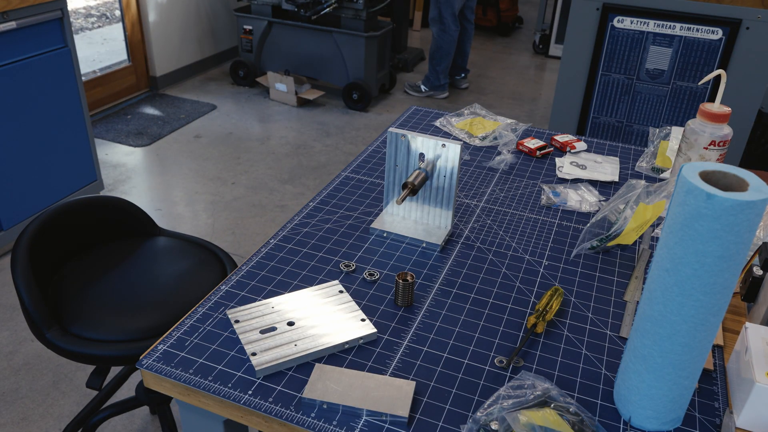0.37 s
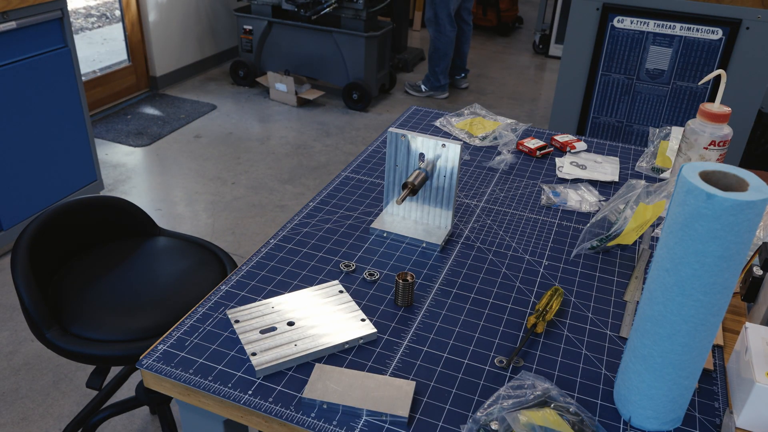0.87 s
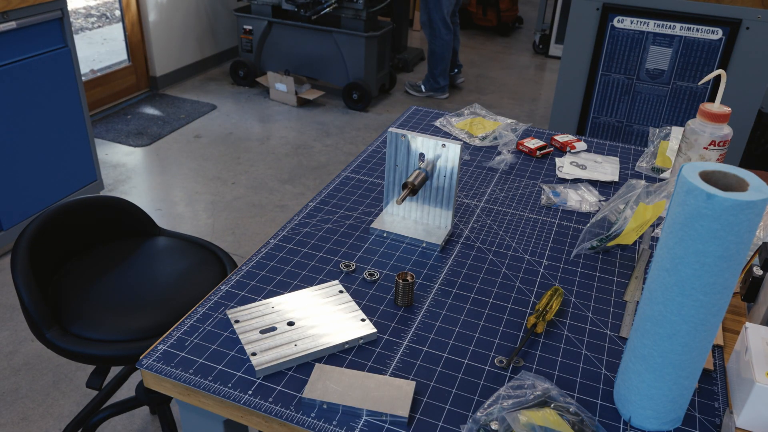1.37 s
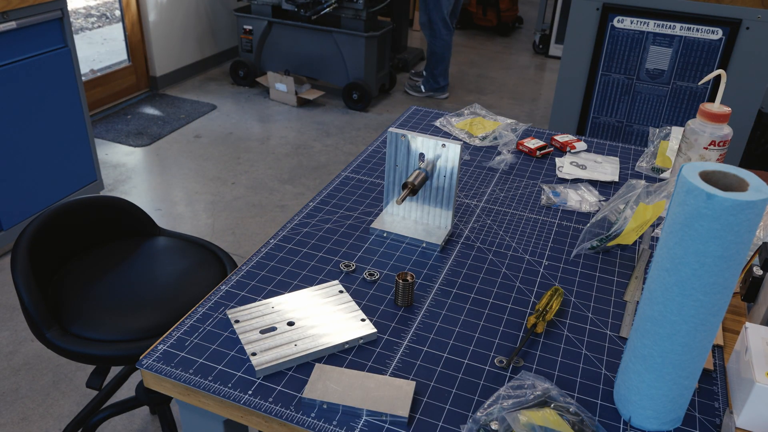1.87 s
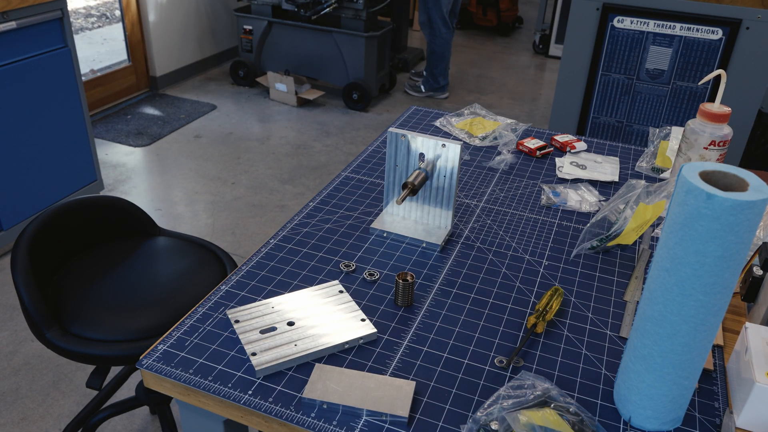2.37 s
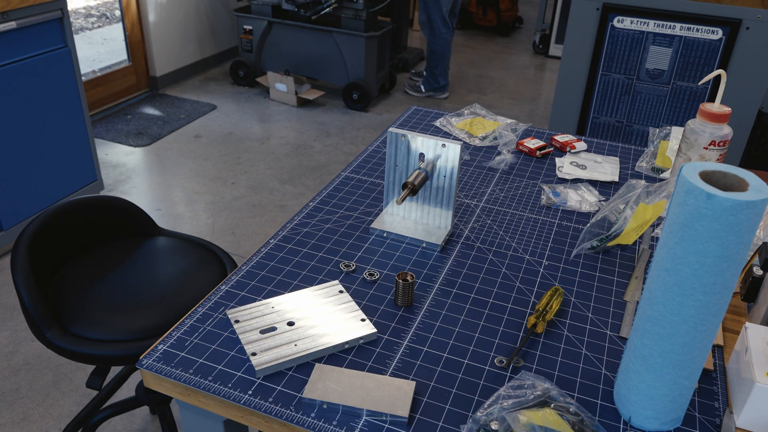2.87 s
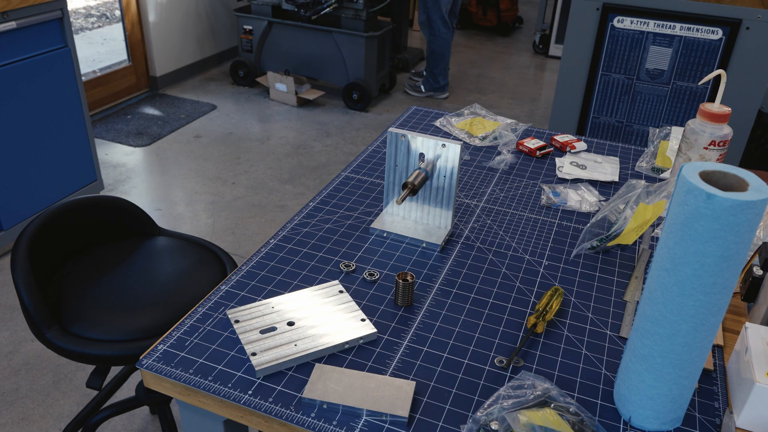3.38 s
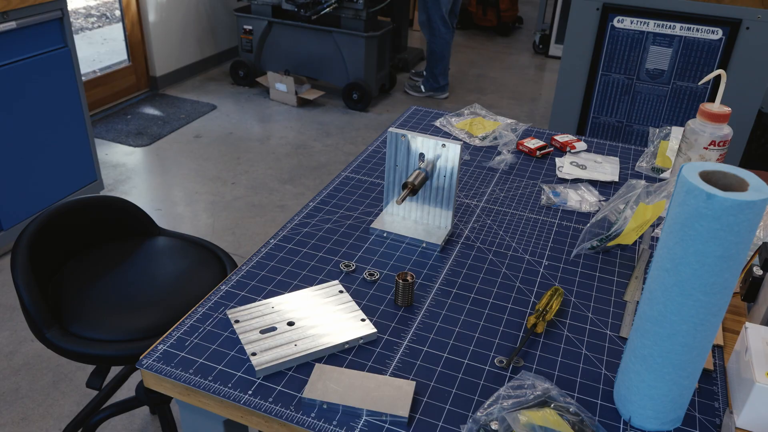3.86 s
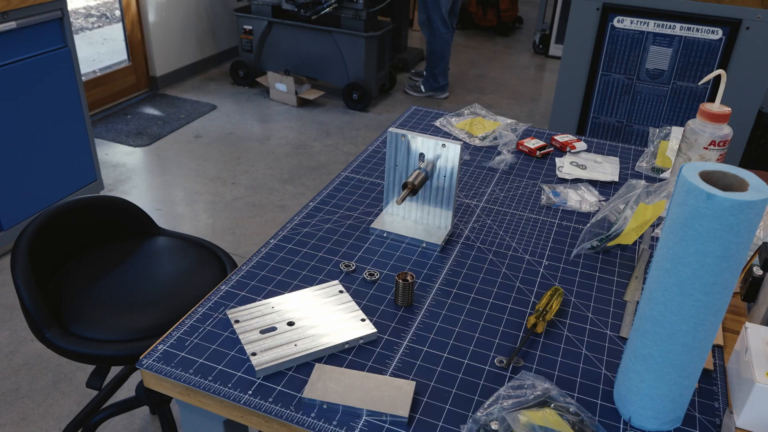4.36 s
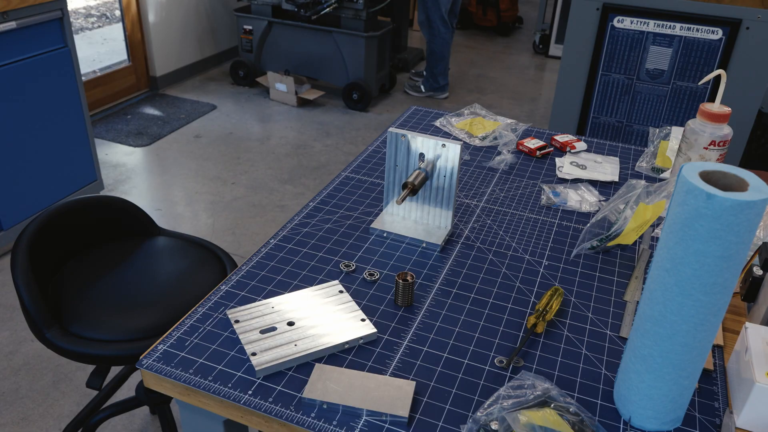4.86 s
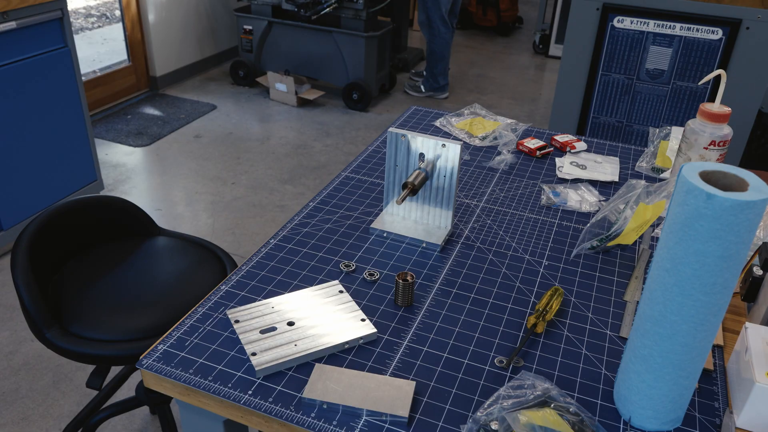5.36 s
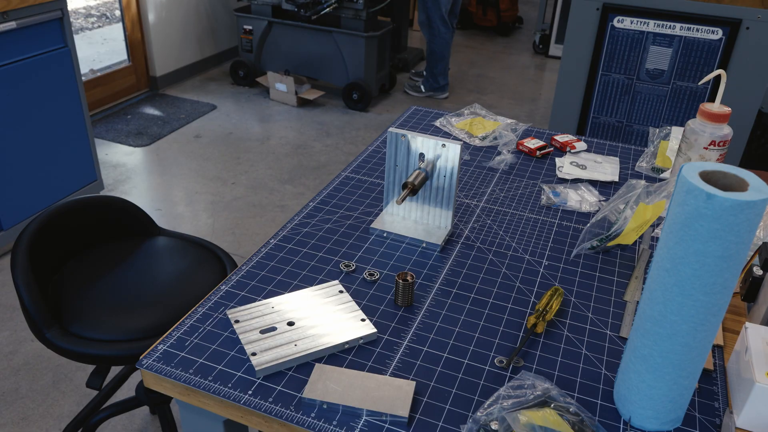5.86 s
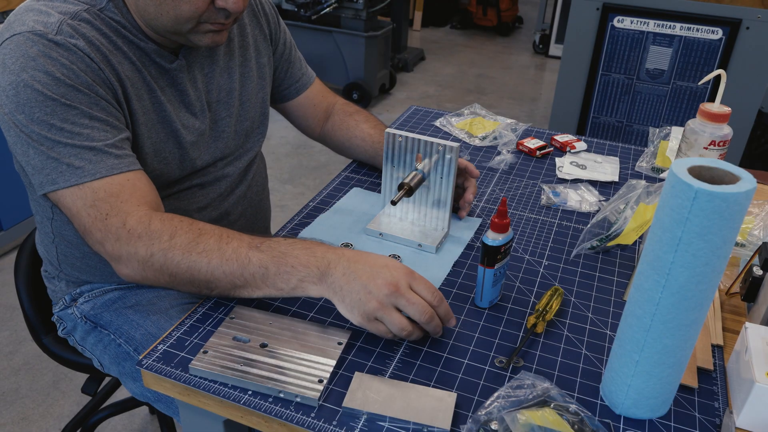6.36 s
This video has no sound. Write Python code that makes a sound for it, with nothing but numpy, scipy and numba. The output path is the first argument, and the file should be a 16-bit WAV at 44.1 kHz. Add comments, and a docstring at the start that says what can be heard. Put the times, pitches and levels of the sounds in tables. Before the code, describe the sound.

From 0 s a bench motor across a workshop runs up: mains buzz and rising slot tones growl through a resonant stand, with short singing notes and rapid rattling of loose metal. A dry switch drag enters near 0.5 s, with snaps at about 0.6 and 0.8 s and a thin squeak. By 1.05 s it reaches full speed and settles into a hum and throbbing airy rush. At 2.15 s a steel shaft presses on the abrasive wheel: a harsh, hissing scrub with high ringing, fluttering every turn, thinner and bouncier after 3.5 s, fading by 4.45 s. The rush continues through tiny scratches and pings at 4.5-4.8 s. A second press from about 4.85 s is brighter, steadier and more repetitive, with a faint singing underneath. At 6.05 s it cuts abruptly to very quiet room noise, faint rustles and soft bench bumps until 6.5 s.

```python
"""In a workshop, a bench motor across the room runs up to speed, then settles to a hum and a rush of noise.
Its slot tones climb through a ringing stand, while loose parts rattle and the starting switch drags and snaps.
A steel shaft is pressed twice on the abrasive wheel: noise that partly repeats each turn is its scrub and ring.
Then the sound cuts to the quiet shop: soft room noise with faint rustles and bumps."""
import sys
import numpy as np
from scipy import signal
from scipy.fft import rfft, irfft, next_fast_len
from scipy.io import wavfile
from scipy.ndimage import uniform_filter1d, map_coordinates
from numba import njit

SR = 44100
rng = np.random.default_rng(int(sys.argv[2]) if len(sys.argv) > 2 else 0)


def transcribe(signal):
    """Save signal, clipped to [-1, 1], as a 16-bit WAV file at the path in sys.argv[1]."""
    frames = np.atleast_2d(signal).T
    limited = np.clip(frames, -1, 1)
    pcm = np.round(limited * 32767).astype(np.int16)
    wavfile.write(sys.argv[1], SR, pcm)


def undo_db(level):
    """Turn decibels back into plain size, where 20 dB means ten times bigger."""
    steps = np.asarray(level, float) / 20
    return 10 ** steps


N = 286032
T = np.arange(N) / SR  # time in s
CUT_S = 6.047  # the grinder gives way to the quiet shop
PULL_HZ, SLOTS = 120, 24  # magnetic pulls per second; rotor slots per turn
TURN = 1475  # samples a turn at full speed

# Run-up: time between rotor slots [t/s, period/ms]
SLOT_PERIOD = [(0, 7.69), (.135, 6.45), (.355, 5.15), (.595, 3.87), (.8, 2.77), (.9, 2.19), (1.015, 1.45),
               (1.05, 1.394)]
# Slot tones split by the mains pull [multiple of slot rate, steps of pull rate, relative level/dB]
SLOT_TONES = [(1, 0, 2), (1, -1, 0), (1, -2, -6), (1, 1, -7), (1, 2, -8), (2, 0, -8), (2, -1, -7),
              (2, -2, -14), (3, -1, -9), (3, -2, -7), (3, -3, -9), (4, -2, -11), (4, -3, -9), (4, -4, -10)]
# Mains buzz in the stand, fading as the motor speeds up
# [multiple of pull rate, relative level/dB before the fade]
BUZZ = [(2, -5), (3, -3), (4, -8), (5, -6), (6, -9), (8, -25), (10, -8)]
# Resonances of the stand, and of its guard [f/Hz, width of one filter/Hz, relative level/dB]
STAND_MODES = [(182, 76, -12.5), (240, 36, -5.5), (286, 58, -11), (339, 54, -3.5), (428, 70, 2.5),
               (504, 110, -6), (636, 200, -12.5), (910, 570, -15.5), (1720, 1600, -54)]
GUARD_MODES = [(778, 30, 0)]
# Slot tones that drive the guard [multiple of slot rate, peak level/dB before the guard]
GUARD_ORDERS = [(2, -31), (3, -22), (4, -27), (5, -36)]
# Strain of the run-up, heard as the growl of the stand [t/s, level/dB]
GROWL = [(0, -32.5), (.2, -24.5), (.5, -24.5), (.8, -18), (.92, -20), (1.09, -27.5), (1.2, -20)]
# Short tones singing near 430 Hz during the run-up [start t/s, length/s, peak level/dB]
SINGING_TONES = [(.495, 0.042, -17), (.58, 0.036, -19), (.635, 0.045, -15.5), (.825, 0.044, -12),
                 (.885, 0.054, -17), (.922, 0.095, -17.5)]
# Pitch of that singing; the last tone glides upward [t/s, f/Hz]
SINGING_PITCH = [(.5, 425), (.66, 432), (.83, 430), (.86, 443), (.918, 450), (.922, 385), (.975, 440),
                 (1.01, 505)]
# Resonances of the loose parts, and of a plate [f/Hz, width/Hz, relative level/dB]
RATTLE_MODES = [(2450, 215, 12), (2750, 130, 16), (2970, 180, 10.5), (3400, 2000, -6), (5500, 840, -42)]
PLATE_MODES = [(1298, 43, 0)]
# Loudness of the plate [t/s, level/dB]
PLATE_LEVEL = [(0.0, -43.5), (0.128, -40.5), (0.232, -41), (0.272, -50), (0.302, -39), (0.386, -46),
               (0.516, -36.5), (0.652, -44), (0.79, -34.5), (0.832, -44), (0.878, -34), (0.982, -35),
               (1.05, -27.5), (1.1, -36)]
# Surges of the mains hum [start t/s, length/s, peak level/dB]
SURGES = [(-.1, 0.3, -33.5), (.34, 0.18, -37.5), (.69, 0.054, -35.5), (.8, .05, -52), (1.05, 0.25, -42)]

# Rush at speed; its level dips during the grinding [t/s, level/dB, treble gain/dB]
RUN = [(1.04, -25, 0.5), (1.35, -27, 3), (1.6, -27, 2), (2.15, -27.5, 0), (2.21, -28, -2),
       (2.4, -30.5, -13), (2.75, -35, -5.5), (3.2, -37.5, -4.5), (4.25, -36.5, 0.5), (4.35, -34, -0.5),
       (4.55, -34, 3.5), (4.62, -32.5, 1.5), (4.73, -34, 4), (4.88, -34, -15), (5.05, -38.5, -10),
       (6.04, -38, -30)]
# Colour of the rush [f/Hz, relative level/dB per Hz]
RUSH_COLOUR = [(18, -73), (30, -40), (179, -17), (233, -7.5), (295, -13.5), (384, 0), (649, 0), (721, 1),
               (1040, -2.5), (1250, -1.5), (2170, -21.5), (2540, -20.5), (5500, -23.5), (7800, -24.5),
               (9800, -26.5), (11700, -26), (12700, -30.5), (16000, -36.5)]
# Steady tones on multiples of a turn [f/Hz, peak level/dB re the rush]
HUM = [(120, -35), (240, -5.5), (269, -20), (389, -9), (479, -9.5), (599, -9.5), (719, -5), (748, -8.5),
       (1197, -26)]

# The two presses on the wheel [t/s, scrub level/dB, treble level/dB re scrub, ring level/dB]
GRIND = [
    [(2.149, -37, -5, -33), (2.17, -32.5, -10, -33), (2.35, -30, -7, -27), (2.55, -30.5, -5.5, -28),
     (2.85, -31, -7.5, -25), (2.96, -28, -11, -33), (3.05, -30.5, -10.5, -25.5), (3.19, -30, -10, -28.5),
     (3.27, -31.5, -5.5, -26), (3.45, -30.5, -6.5, -31), (3.8, -36, -1, -28.5), (4.08, -36.5, -0.5, -31.5),
     (4.24, -35.5, 1.5, -31), (4.29, -38, -3.5, -23.5), (4.34, -39.5, 2, -48), (4.38, -46, -2, -43),
     (4.42, -49, 0, -53), (4.47, -53, -6, -68)],
    [(4.732, -58, 2, -27), (4.74, -47, 2, -29), (4.755, -45, 5, -33), (4.78, -46, 3, -30),
     (4.81, -43, 4, -26), (4.84, -44.5, -1.5, -23), (4.856, -34.5, -5, -26), (4.88, -33.5, -2, -27.5),
     (5.05, -35.5, -4.5, -24), (5.3, -38, 2, -29.5), (5.42, -36.5, -1, -30.5), (5.6, -39.5, 4.5, -32),
     (5.92, -38.5, 4.5, -33.5), (6.0, -40, 4.5, -25), (6.04, -43.5, 3, -26)],
]
# How still the shaft is held, so that the same grit meets it each turn [t/s, share 0-1]
STILL = [(2.5, .15), (2.9, .1), (3.5, .2), (4.0, .4), (5.0, .3), (5.35, .55), (5.7, .65)]
# The wheel runs out of true [share of a turn, height as level/dB, scaled in each use]
RUNOUT = [(.04, -2), (.12, -.5), (.21, 0), (.29, 2.5), (.37, 1.5), (.46, -1), (.56, -2.5), (.68, -3),
          (.79, 0), (.87, 2), (.96, 0)]
# Pitch of the ring, shifting a little with the grip [t/s, f/Hz]
RING_PITCH = [(2.15, 7630), (2.37, 7690), (2.83, 7620), (2.97, 7520), (3.42, 7640), (3.75, 7550),
              (4.3, 7660), (4.85, 7715), (5.05, 7710), (5.43, 7590), (5.7, 7680), (5.95, 7590)]
# High spots that set the ring going [share of a turn, level/dB before the bounce scales it]
RING_SPOTS = [(.04, -6), (.12, -2), (.22, 0), (.37, 2), (.46, 0), (.54, -6), (.62, 1), (.71, 1), (.79, -4),
              (.87, 4), (.96, 1)]
# A broad mode under the ring [t/s, level/dB re ring]
SHOULDER = [(2.15, -22), (2.8, -21), (2.92, -3.5), (3.1, -10), (3.3, -11), (3.45, -23), (6.04, -19)]
# Bounce on the high spots and the bending mode
# [t/s, bounce depth 0-1, mode level/dB before trim, centre f/Hz, throb as a factor on the runout]
BOUNCE = [(2.2, .1, 1, 4450, .2), (2.9, .15, 3, 4400, .4), (3.05, .15, 5, 4330, .4),
          (3.5, .3, 5, 4420, .45), (3.65, 1, 9, 4500, .35), (4.2, .8, 8, 4520, .3), (4.33, .2, 8, 4120, .3),
          (4.7, .2, 13, 4250, .3), (4.84, .2, 11, 4250, .3), (4.92, .2, 3, 4450, .4),
          (5.25, .15, 5, 4620, .6), (5.45, .15, 5, 4500, 1), (6.0, .15, 5, 4500, 1.2)]
# Low and middle shaft modes [f/Hz, width/Hz, relative level/dB]
SHAFT_LOW = [(1740, 31, -10), (3330, 90, -16), (3500, 150, -13), (3890, 130, -6), (4020, 70, -4),
             (4250, 140, -3), (4700, 120, -3), (4880, 220, -6), (5200, 140, -7)]
SHAFT_MID = [(5280, 1670, -0.5), (5960, 45, 4), (6010, 110, 2), (7070, 390, -1.5)]
# Thin modes heard once the shaft is held still [f/Hz, width/Hz, relative level/dB]
SHAFT_THIN = [(2720, 60, -8), (3150, 35, -2), (3360, 25, 0), (3980, 30, 0), (4250, 30, 1), (5800, 45, 4),
              (6150, 60, 4), (8150, 70, 5), (8520, 60, 3)]
# A mode that swells once a turn [t/s, level/dB re low modes, before the swing]
UPPER = [(2.2, -26), (3.3, -14), (3.7, -12), (4.25, -6), (4.4, -20), (4.9, -22), (5.3, -10), (5.55, -6),
         (5.9, -5), (6.04, -10)]
# The 5-7 kHz part of the treble [t/s, level/dB]
MIDDLE = [(2.15, 1.7), (4.25, 1.5), (4.74, 0), (4.84, -3), (4.9, 1.5), (6.04, 0.8)]
# Colour of the grit hiss [f/Hz, relative level/dB per Hz]
GRIT_COLOUR = [(5000, -25), (8500, 1), (9990, -0.5), (14400, -3), (15200, -4), (16000, -30)]
# A dull patch in the grit moves as the grip shifts [t/s, f/Hz]
DULL_PATCH = [(2.9, 12600), (3.25, 10000), (4.3, 10400), (4.9, 11000), (6.0, 11860)]
# Single catches of the shaft [t/s, start level/dB before shaping]
TOUCHES = [(2.1515, -27), (2.178, -20), (4.488, -29), (4.5096, -33), (4.6595, -33), (4.6875, -24),
           (4.7205, -16), (4.75, -20), (4.758, -18), (4.77, -20), (4.787, -19), (4.799, -17), (4.805, -16),
           (4.814, -21), (4.821, -22), (4.839, -14)]
# Grit scratches in passing [t/s, start level/dB before filtering]
SCRAPES = [(4.405, -31), (4.4875, -20), (4.51, -38), (4.687, -25), (4.72, -31)]
# Singing of the tool rest [t/s, level/dB]
REST_HUM = [(4.95, -56), (5.15, -45.5), (6.05, -50)]

# The starting switch drags and lets go [t/s, level/dB before the wobble]
SWITCH_DRAG = [(.456, -86), (.466, -54.5), (.57, -41.5), (.65, -41.5), (.67, -51.5), (.925, -42.5),
               (1.0, -51), (1.05, -69)]
# Colour of the drag [f/Hz, relative level/dB per Hz]
SWITCH_COLOUR = [(2940, -31), (5000, -15.5), (6830, -5.5), (7530, -6), (12800, -2.5), (14900, -12),
                 (16000, -0.5)]
# Snaps of the switch [t/s, start level/dB before filtering]
SNAPS = [(0.623, -21.5), (0.7915, -32)]
# Thin squeak of the switch [t/s, level/dB]
SQUEAK = [(.81, -70), (.83, -62), (.9, -55), (.97, -59), (1.0, -75)]

# Colour of the quiet shop [f/Hz, relative level/dB per Hz]
SHOP_COLOUR = [(25, 8), (60, 4), (110, 5), (190, 8), (300, 5), (520, 0), (640, -9), (1100, -13),
               (1700, -16), (2320, -12), (3300, -19), (5100, -24), (7000, -31), (16000, -35)]
# Rustles of handling [start t/s, length/s, peak level/dB before the wobble]
DULL_RUSTLES = [(6.2, 0.21, -74), (6.4, 0.089, -69)]
BRIGHT_RUSTLES = [(6.225, .05, -66), (6.25, .17, -74)]
# Soft bumps on the bench [t/s, start level/dB, f/Hz]
THUDS = [(6.105, -62, 1250), (6.136, -53, 100), (6.195, -57, 279), (6.38, -60, 230), (6.42, -63, 1200),
         (6.47, -65, 1100)]
# Deep rumble under everything [t/s, level/dB]
RUMBLE = [(0, -63), (.7, -70), (1.7, -67), (2.6, -81), (5.9, -74), (6.1, -72), (6.49, -67)]


def level(x, db):
    """Scale a sound to an rms level."""
    return x * undo_db(db) / np.sqrt(np.mean(x ** 2))


def curve(table, column=1, out=None):
    """Join one column by straight lines in time."""
    rows = np.array(table)
    return np.interp(T, rows[:, 0], rows[:, column], left=out, right=out)


def round_curve(table, turns):
    """Read a table by the position within a turn."""
    return np.interp(turns % 1, *np.transpose(table), period=1)


def white():
    """Fresh noise, equally strong at every pitch."""
    return rng.standard_normal(N)


def coloured(x, spectrum):
    """Give a signal a colour, at rms 1."""
    hz, db = np.transpose(spectrum)
    size = next_fast_len(N)
    f = np.maximum(np.arange(size // 2 + 1) * SR / size, 1)
    gain = undo_db(np.interp(np.log(f), np.log(hz), db))
    return level(irfft(rfft(x, size) * gain, size)[:N], 0)


def hiss(spectrum):
    """Fresh noise with the given colour."""
    return coloured(white(), spectrum)


def tone(cycles, db):
    """A sine with a random starting point; db sets its peak."""
    return undo_db(db) * np.sin(2 * np.pi * (cycles + rng.random()))


@njit
def svf(x, hz, width):
    """Band-pass (state-variable filter) whose centre may move."""
    y, b, l = np.empty(len(x)), 0., 0.
    for i in range(len(x)):
        g, k = np.tan(np.pi * hz[i] / SR), width / hz[i]
        v = (b + g * (x[i] - l)) / (1 + g * (g + k))
        b, l, y[i] = 2 * v - b, l + 2 * g * v, k * v
    return y


def band(x, hz, width):
    """The moving band-pass held at one pitch."""
    return svf(x, np.full(N, float(hz)), float(width))


def ring(x, modes, steep=False):
    """A body of several resonances; steep ones are filtered twice, for dark flanks."""
    total = 0
    for k, (hz, width, db) in enumerate(modes):
        b, a = signal.iirpeak(hz, hz / width, SR)
        y = signal.lfilter(b, a, x)
        if steep:
            y = signal.lfilter(b, a, y)
        total = total + (-1) ** k * undo_db(db) * y
    return total


def walk(rate):
    """Random levels held 1 / rate s and smoothed twice; spread near 1."""
    k = int(SR / rate)
    steps = np.repeat(rng.standard_normal(N // k + 1), k)
    return 1.62 * uniform_filter1d(uniform_filter1d(steps, k), k)[:N]


def evened(x, share, size):
    """Stick-slip holds a ringing near one swing: take out part of its random rise and fall; rms 1."""
    return level(x / (uniform_filter1d(x ** 2, size=size) + 1e-12) ** (share / 2), 0)


def squeal(hz, jitter_hz):
    """Stick-slip locked to a mode: a tone with a trembling pitch; rms 1."""
    return np.sqrt(2) * np.sin(2 * np.pi * np.cumsum(hz + jitter_hz * walk(160)) / SR)


def swells(events, blunt=0.2):
    """Each event rises and falls as an arch; small blunt flattens its top."""
    total = 0
    for start, length, db in events:
        arch = np.sin(np.pi * np.clip((T - start) / length, 0, 1)).clip(0) ** blunt
        total = total + undo_db(db) * arch * (T < start + length)
    return total


def blows(events, decay_s):
    """Sudden rise and quick decay at the given times."""
    return sum(undo_db(db) * (T >= s) * np.exp(-np.maximum(T - s, 0) / decay_s) for s, db in events)


def clicks(events, decay_s):
    """Short bursts of noise at the given times."""
    return blows(events, decay_s) * white()


def each_turn(memory=0.92):
    """Noise that nearly comes back after one turn; rms 1."""
    rows = rng.standard_normal((N // TURN + 1, TURN))
    return level(signal.lfilter([1], [1, -memory], rows, axis=0).ravel()[:N], 0)


def partly_repeating(share):
    """Fresh noise with a share of power that nearly repeats each turn."""
    share = np.clip(share, 0, 1)
    return np.sqrt(1 - share) * white() + np.sqrt(share) * each_turn()


def round_the_wheel(turns, count, renew):
    """A random profile round the rim that comes back each turn and slowly wears into a new one."""
    rows = int(turns[-1] * renew) + 2
    rim = rng.standard_normal((rows, count))
    return 1.4 * map_coordinates(rim, [turns * renew, turns % 1 * count], order=1, mode="grid-wrap")


def stand_growl(slots):
    """Slot tones and mains buzz ring the stand each time they cross its modes."""
    pull = PULL_HZ * T
    wobble = lambda: 2.5 * walk(35)  # dB
    tones = sum(tone(k * slots + m * pull, db + wobble()) for k, m, db in SLOT_TONES)
    buzz = sum(tone(k * pull, db + wobble()) for k, db in BUZZ)
    # the buzz fades as the rotor gathers speed and the noise grows
    drive = tones + undo_db(2.0 - 21.0 * T) * buzz + undo_db(9.5 + 6.2 * T) * white()
    growl = ring(drive, STAND_MODES, steep=True)
    # the strained stand yields: its swing follows the strain more than the drive
    growl = growl / np.sqrt(uniform_filter1d(growl ** 2, size=5000))
    return undo_db(curve(GROWL)) * growl


def singing_tones():
    """Short tones sing near 430 Hz during the run-up, the last gliding upward."""
    cycles = np.cumsum(curve(SINGING_PITCH)) / SR
    return swells(SINGING_TONES, blunt=0.79) * tone(cycles, 0)


def guard(slots):
    """Multiples of the slot rate ring the guard as they pass its mode."""
    return ring(sum(tone(k * slots, db) for k, db in GUARD_ORDERS), GUARD_MODES, steep=True)


def loose_parts():
    """Loose parts and a plate ring to one knock at every pull, blurred by scraping as the speed rises."""
    knocks = np.diff(np.floor(PULL_HZ * T), prepend=0) * undo_db(2 * walk(62))
    knocks = knocks + undo_db(-28.5 + 16.3 * np.minimum(T, 1)) * white()
    # the rattle starts near -40.5 dB and quietens by 14 dB per second
    rattle = level(ring(knocks, RATTLE_MODES), 0) * undo_db(-40.5 - 14 * T + 2.0 * walk(14.6))
    plate = evened(ring(knocks, PLATE_MODES), 0.86, size=900) * undo_db(curve(PLATE_LEVEL))
    return rattle + plate


def run_up(slots):
    """The motor gathers speed: growl, singing, guard, loose parts and surges of mains hum, then a fade."""
    mains_hum = swells(SURGES) * tone(PULL_HZ * T, 0)
    fade = np.clip((1.2 - T) / 0.065, 0, 1)
    return fade * (stand_growl(slots) + singing_tones() + guard(slots) + loose_parts() + mains_hum)


def rush_of_air(turns):
    """Air and bearings rush, throbbing with the turn."""
    throb_db = 0.43 * round_the_wheel(turns, count=6, renew=0.104) + .6 * walk(9)
    rush = coloured(partly_repeating(0.042), RUSH_COLOUR) * undo_db(throb_db)
    high_pass = signal.butter(2, 1470, "high", fs=SR, output="sos")
    treble = signal.sosfiltfilt(high_pass, rush)
    return rush + (undo_db(curve(RUN, column=2)) - 1) * treble


def stand_drone():
    """At speed the stand drones: narrow noise near 400 Hz in random bursts."""
    drone = ring(white(), [(400, 38, 0)], steep=True)
    return level(drone * undo_db(2.0 * walk(14)), -44.5)


def running(turns):
    """The motor at speed: a throbbing rush and wavering tones rise in, then the drone of the stand."""
    tones = sum(tone(hz * T, db + 0.5 * walk(7.6)) for hz, db in HUM)
    rise = lambda start, length: np.clip((T - start) / length, 0, 1) ** 2
    steady = rise(0.95, 0.097) * rush_of_air(turns) + rise(0.76, 0.33) * tones
    return undo_db(curve(RUN)) * steady + rise(1.4, .6) * stand_drone()


def shaft_ring(turns, still, face, edge):
    """High spots make the shaft ring at a shifting pitch, over a broad mode beneath."""
    hz, bounce = curve(RING_PITCH), curve(BOUNCE)
    drive = partly_repeating(still)
    main = svf(drive, hz, 170.) + undo_db(-20) * svf(drive, hz, 1100.)
    main = evened(main, .7, size=150)
    shoulder = level(ring(white() * undo_db(.7 * edge), [(7050, 550, 0)]), 0)
    # more bounce: less of the random face, more of the fixed high spots
    bursts_db = (.9 - .6 * bounce) * face + 1.7 * bounce * round_curve(RING_SPOTS, turns) + .7 * walk(12)
    main = level(svf(main * undo_db(bursts_db), hz, 900.), 0)
    return undo_db(curve(SHOULDER)) * shoulder + main


def bending_mode(drive, bend_hz):
    """Noise rings the bending mode; as the shaft bounces, more of it locks into a squeal."""
    bend = svf(svf(drive, bend_hz, 300.), bend_hz, 600.)
    bend = evened(bend, .85, size=130)
    locked = .8 * curve(BOUNCE)
    bend = np.sqrt(1 - locked) * bend + np.sqrt(locked) * squeal(bend_hz, 60)
    return evened(bend, .85, size=110)


def low_scrub(turns, still, face, edge, bend_hz):
    """The scrub rings the low, bending and thin modes of the shaft, and one that swells once a turn."""
    runout = round_curve(RUNOUT, turns)
    drive = partly_repeating(1.2 * still)
    bend_db = curve(BOUNCE, column=2) - 3.5 + curve(BOUNCE, column=4) * runout
    low = evened(ring(drive, SHAFT_LOW), 0.24, size=150)
    low = low + undo_db(bend_db) * bending_mode(drive, bend_hz)
    low = level(low * undo_db(1.4 * runout + .2 * edge + .1 * face), 0)
    thin = level(ring(each_turn() * undo_db(1.4 * runout + .2 * edge), SHAFT_THIN), 0)
    low = low + undo_db(4.5) * still ** 2 * thin
    upper_hz, loudest_share, swing_db = 5190, .83, 5  # the share is of a turn
    upper = .5 * level(ring(drive, [(upper_hz, 110, 0)]), 0) + squeal(upper_hz, 25)
    upper = evened(upper, .8, size=200)
    swing = swing_db * np.cos(2 * np.pi * (turns - loudest_share))
    return low + undo_db(curve(UPPER) + swing) * upper


def scrub_treble(still, face, edge):
    """Middle shaft modes ring under the hiss of the grit, which has a moving dull patch."""
    middle_drive = partly_repeating(1.4 * still) * undo_db(.5 * face + .4 * edge)
    middle = level(ring(middle_drive, SHAFT_MID), 0)
    grit_drive = partly_repeating(0.33 * still) * undo_db(0.48 * face + 0.75 * edge)
    grit = coloured(grit_drive, GRIT_COLOUR)
    grit = grit - 0.37 * svf(grit, curve(DULL_PATCH), 1500.)
    return undo_db(curve(MIDDLE)) * middle + undo_db(.77) * grit


def touches(bend_hz):
    """Single high spots catch the shaft as it leaves and nears the wheel; passing grit scratches it."""
    soft = uniform_filter1d(blows(TOUCHES, 0.002), size=130)
    ping = soft * np.sin(2 * np.pi * np.cumsum(curve(RING_PITCH)) / SR)
    knock = svf(svf(soft * white(), bend_hz, 650.0), bend_hz, 900.)
    scratches = band(clicks(SCRAPES, 0.0011), 9000, 9000)
    return undo_db(4.5) * ping + undo_db(6.5) * knock + scratches


def tool_rest():
    """The tool rest sings near 1710 Hz, driven by noise that partly returns each turn."""
    return undo_db(curve(REST_HUM, out=-120)) * evened(ring(each_turn(.4), [(1710, 85, 0)]), .4, size=400)


def grinding():
    """High spots of the wheel scrub the shaft: its modes ring in bursts over the hiss of the grit."""
    turns = np.arange(N) / TURN
    still = curve(STILL)
    # the springy rim evens out the highest spots
    spots = lambda: 3.5 * np.tanh(.9 * round_the_wheel(turns, count=14, renew=.12))
    face, edge = spots(), spots()
    # the pitch of the bending mode rises and falls once a turn; lowest at .85 of a turn
    swing_hz = 190 * curve(BOUNCE)
    bend_hz = curve(BOUNCE, column=3) - swing_hz * np.cos(2 * np.pi * (turns - .85))
    first, second = GRIND
    rows = first + second
    touching = ((T > first[0][0]) & (T < first[-1][0])) | (T > second[0][0])
    wander = lambda: undo_db(.7 * walk(14))  # the hand is never quite steady
    scrub = low_scrub(turns, still, face, edge, bend_hz)
    scrub = scrub + undo_db(curve(rows, column=2)) * scrub_treble(still, face, edge)
    held = undo_db(curve(rows)) * wander() * scrub
    held = held + undo_db(curve(rows, column=3)) * wander() * shaft_ring(turns, still, face, edge)
    contact = uniform_filter1d(1. * touching, size=200)
    return contact * held + touches(bend_hz) + tool_rest()


def switch():
    """The starting switch: a dry drag in the treble, two snaps and a thin squeak."""
    drag = undo_db(curve(SWITCH_DRAG, out=-120) + 2 * walk(90)) * hiss(SWITCH_COLOUR)
    snaps = band(clicks(SNAPS, 0.0012), 11500, 8000)
    squeak = undo_db(curve(SQUEAK, out=-120)) * level(band(white(), 6660, 150), 0)
    return drag + undo_db(2.0) * snaps + squeak


def handling():
    """Faint rustles of shaped noise and soft bumps of decaying narrow noise."""
    dull_colour = [(1500, -13.0), (4500, -10), (6500, -7), (9000, -18), (12000, -21)]  # f/Hz, dB per Hz
    bright_colour = [(6000, -10), (11000, -8), (14500, 2), (16000, -2)]
    dull = swells(DULL_RUSTLES) * undo_db(2 * walk(40)) * hiss(dull_colour)
    bright = swells(BRIGHT_RUSTLES) * undo_db(2 * walk(40)) * hiss(bright_colour)
    thuds = sum(blows([(s, db)], 0.021) * level(band(white(), hz, 0.45 * hz), 0) for s, db, hz in THUDS)
    return dull + bright + thuds


def shop():
    """Wavering room noise, a little louder just after the cut, with sounds of handling."""
    settle_db = 6.5 * np.exp(-np.maximum(T - CUT_S, 0) / 0.2)
    room = undo_db(-61.5 + settle_db + 2 * walk(17)) * hiss(SHOP_COLOUR)
    return room + handling()


def rumble():
    """Deep noise whose level drifts."""
    return undo_db(curve(RUMBLE)) * hiss([(20, -2.0), (60, 4.5), (120, -26.5)])


def scene():
    """The grinder until the cut, the quiet shop after it."""
    slots = np.cumsum(1000 / curve(SLOT_PERIOD)) / SR  # slots passed so far
    turns = slots / SLOTS
    grinder = run_up(slots) + running(turns) + grinding() + switch()
    before = np.clip((CUT_S - T) / 0.0042, 0, 1)
    return (before * grinder + (1 - before) * shop())[None]


def band_limit(x):
    """A steep low-pass at the top of the band."""
    return signal.sosfilt(signal.butter(12, 16520, fs=SR, output="sos"), x)


def record(dry):
    """The small microphone rounds the loudest peaks and drops the deep bass; rumble joins; the top is cut."""
    rounded = .31 * np.tanh(dry / .31)
    bass_cut = signal.butter(3, 95, "high", fs=SR, output="sos")
    mix = signal.sosfilt(bass_cut, rounded) + rumble()
    top_cut = signal.ellip(8, .2, 60, 15800, fs=SR, output="sos")
    return band_limit(signal.sosfilt(top_cut, mix))


dry = scene()
out = record(dry)
transcribe(out)
```